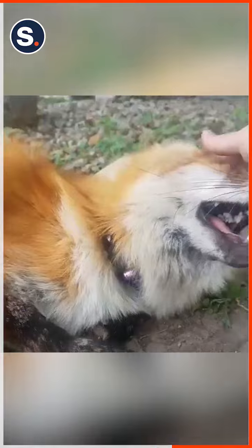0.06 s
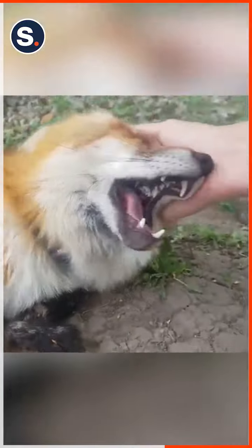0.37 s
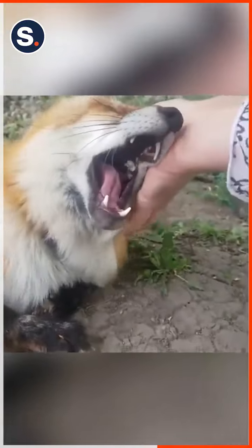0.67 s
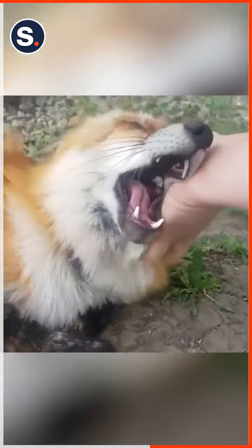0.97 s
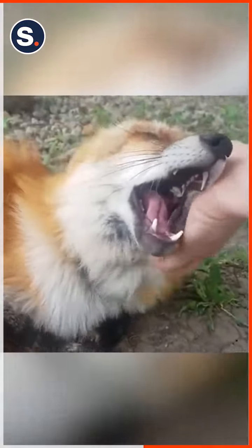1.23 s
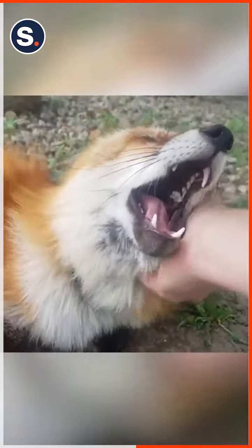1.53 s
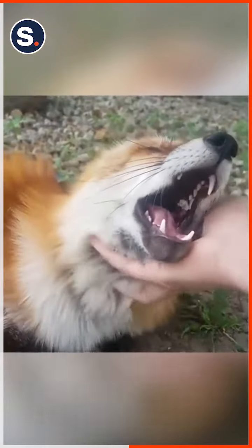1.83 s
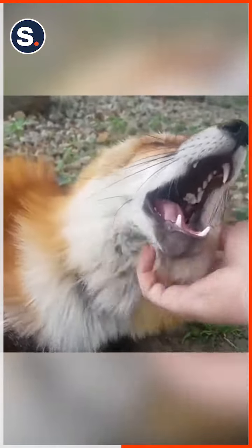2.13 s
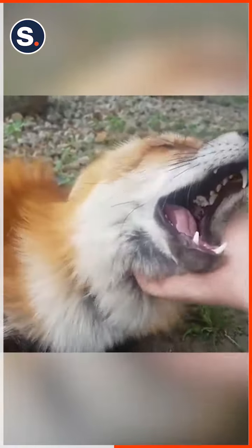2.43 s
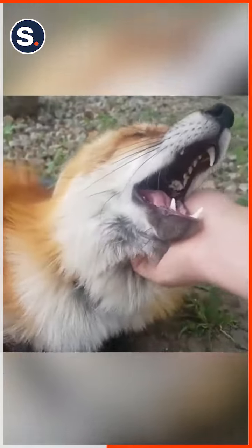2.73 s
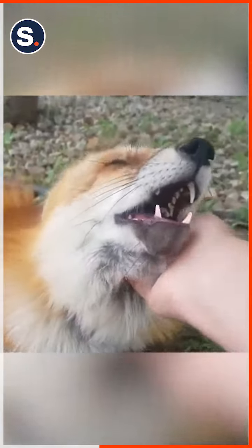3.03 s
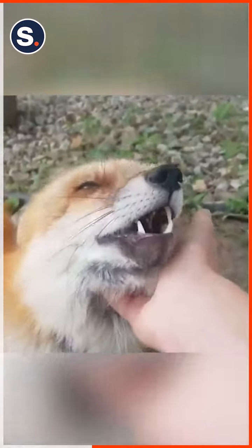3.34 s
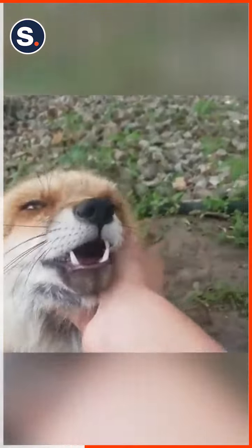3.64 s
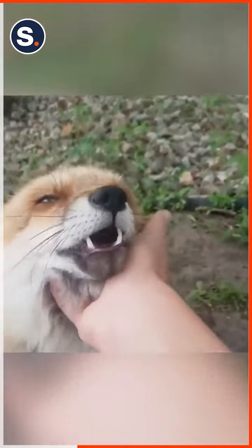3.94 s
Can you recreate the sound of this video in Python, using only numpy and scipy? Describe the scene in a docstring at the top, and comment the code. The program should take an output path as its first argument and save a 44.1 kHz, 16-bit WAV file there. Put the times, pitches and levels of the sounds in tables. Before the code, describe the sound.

A fox wails three times close by, in high, harsh squeals outdoors.

```python
"""A fox, petted under the chin, wails three times close by, outdoors. Its vocal folds oscillate
periodically, giving a high harmonic squeal that sags in pitch. At times the period doubles, adding
subharmonics and one short bark, or the folds slap irregularly and ring the throat as rasps and clicks.
The mouth filters the overtones and the air hissing through the jaws; the direction shifts as the head
turns. Behind it lie soft air noise, a distant hum and one swell of low rumble."""
import sys
import numpy as np
from scipy import signal
from scipy.fft import rfft, irfft
from scipy.io import wavfile
from scipy.ndimage import uniform_filter1d

SR = 44100
rng = np.random.default_rng(int(sys.argv[2]) if len(sys.argv) > 2 else 0)


def inscribe(sig):
    """Save sig as 16-bit PCM at rate SR to the path in sys.argv[1].

    A 1-D sig is mono; a 2-D sig holds one channel per row.
    Samples are clipped to [-1, 1] before scaling.
    """
    pcm = np.round(np.clip(np.atleast_2d(sig).T, -1, 1) * 32767)
    wavfile.write(sys.argv[1], SR, pcm.astype(np.int16))


N = 176400
T = np.arange(N) / SR

# Spectrum of the outdoor air: f/Hz, relative level/dB
AIR_SPECTRUM = [(35, -14.5), (80, -4), (190, -14), (450, -8.5), (750, -16.5), (1400, -15.5), (6000, -44.5),
                (13000, -38)]
# Partials of the distant hum: f/Hz, level/dB
HUM_PARTIALS = [(72, -57), (86, -55.5), (143.5, -60)]
# Throat resonances: f/Hz, bandwidth per stage/Hz, gain/dB
FORMANTS = [(1104, 400, -2.5), (2032, 377, 6.5), (2396, 350, -1.5)]
# Mouth response with the jaws wide: f/Hz, gain/dB
MOUTH_WIDE = [(2800, -5.5), (3600, 16), (4600, 10), (5500, 4.5), (6300, 10.5), (7100, 15), (7900, 3.5),
              (9500, -5.5), (10700, 5.5), (12600, -15)]
# Mouth response when narrowed: f/Hz, gain/dB
MOUTH_NARROW = [(3000, 13), (3400, -9), (4100, 4), (5000, 10), (6200, -23), (7600, -12), (8500, 7),
                (10500, -6), (13000, -4)]
# Narrowing of the mouth: t/s, fraction (0-1)
NARROWING = [(.93, 0), (1.02, 0.97), (1.35, 0.57), (2.45, 0.06), (2.8, 0.05), (3.0, 0.95)]
# Direction as the head turns: t/s, left-right difference of harmonic 1/dB, of harmonic 2/dB
HEAD_TURN = [(.4, -9.5, 8), (.85, -8, -0.5), (2.3, 2.5, -3), (2.7, 12, -5.5), (3.6, 5.5, 0)]
# Catches of the voice: t/s, peak level/dB
CLICKS = [(1.324, -19.5), (1.668, -11), (2.225, -21), (3.408, -33)]
# Irregular slapping of the folds: start/s, end/s, level/dB, relative gain of low resonances/dB
RASPS = [(1.446, 1.55, -26, 1), (1.673, 1.697, -24.5, 3.5), (1.846, 1.904, -23, -2), (1.91, 1.95, -33, 3.5),
         (2.399, 2.449, -38, -7), (2.829, 2.935, -31, 10), (3.674, 3.78, -31, 0)]
# Period doubling: start/s, end/s, level/dB, relative gain of low resonances/dB
DOUBLINGS = [(1.288, 1.32, -43, -20), (1.627, 1.653, -39, 8), (3.603, 3.69, -27, -9.5),
             (3.692, 3.824, -25, 0.5), (3.833, 4.047, -27, 3)]
# The three wails: start/s, end/s
WAILS = [(-.02, 1.952), (2.223, 2.958), (3.445, 4.05)]
# Roughness of the voice: t/s, fraction (0-1)
ROUGHNESS = [(.92,0),(.96,.85),(1.13,0.2),(1.22,0.34),(1.9,0.49),(2.43,0.5),(2.48,0.04),(2.8,0.2),(2.86,1),(3.48,0.65),(3.63,0.34),(3.87,0.25)]
# Pitch, and the second harmonic, which jumps at register breaks: t/s, fundamental f/Hz, level/dB
PITCH_AND_SECOND = [(.02,965.5,-20),(.07,899,-34.5),(.12,924,-20.5),(.26,898,-27.5),(.288,935.4,-17.5),(.32,917,-22),(.335,874,-43),(.39,911,-31.5),(.49,888,-36.5),(.515,917,-18),(.62,902,-19.5),(.665,925,-13.5),(.692,907,-15.5),(.706,867,-33),(.79,911.6,-23.5),(.84,876,-29.5),(.935,882,-23.5),(.962,977,-26.5),(1.005,915,-27),(1.03,840,-40),(1.126,717.6,-34),(1.27,754.6,-37),(1.42,798.6,-32.5),(1.5,843,-30.5),(1.72,803.2,-39),(1.78,761.5,-35.5),(1.84,823,-23),(1.89,824,-53),
                    (2.235,1167,-34),(2.258,1035,-23),(2.283,907,-30.5),(2.315,1030,-37.5),(2.334,1032,-12),(2.37,951,-23),(2.398,1036,-28.5),(2.44,978,-15),(2.48,916.6,-20),(2.715,891,-14.5),(2.748,861,-17.5),(2.756,858.7,-29),(2.825,785.7,-32),(2.85,775.6,-58),
                    (3.45,949.3,-21),(3.472,866,-24),(3.495,769,-41.5),(3.55,735,-42),(3.575,815,-23.5),(3.608,660,-51),(3.66,682.3,-43),(3.8,714.8,-58),(3.86,679,-57)]
# First harmonic: t/s, level/dB
FIRST_HARMONIC = [(0,-33),(.42,-27.5),(.55,-35.5),(.96,-30.5),(1.07,-46.5),(1.33,-51.5),(1.5,-37.5),(1.9,-42),(2.23,-33.5),(2.41,-28.5),(2.64,-47.5),(2.79,-32),(2.86,-53.5),(3.45,-41)]
# Third harmonic, which cracks in and out: t/s, level/dB
THIRD_HARMONIC = [(.02,-35),(.315,-27.5),(.335,-43.5),(.5,-31.5),(.69,-31.5),(.71,-38),(.99,-38.5),(1.025,-31.5),(1.23,-27),(1.245,-46),(1.31,-28.5),(1.335,-44),(1.4,-35.5),(1.69,-35.5),(1.715,-22),(1.765,-32.5),(1.787,-19.5),(1.81,-37.5),(2.3,-47),(2.5,-34.5),(2.72,-29),(2.82,-47.5),(3.52,-33.5),(3.63,-31),(3.9,-36.5)]
# Treble: t/s, lower band level/dB, upper band level/dB
TREBLE_LEVELS = [(0,-47.5,-43),(.34,-50,-41),(.44,-36.5,-42.5),(.52,-46,-40.5),(.71,-47.5,-37.5),(.79,-37,-38),(.89,-50.5,-36),(1.06,-30.5,-45.5),(1.27,-47,-46),(1.45,-42.5,-40),(1.88,-36.5,-39),(2.23,-57.5,-48),(2.34,-52,-40),(2.8,-42,-37.5),(2.94,-40,-43.5),(3.45,-50.5,-60),(3.595,-39.5,-64),(3.61,-37.5,-49),(3.95,-36,-50.5)]

ATTACK_S, RELEASE_S = 0.0018, 0.027
JITTER_HZ, SHIMMER_DB = 239.2, 1  # bandwidth of fast unrest; level spread at full roughness
TREBLE_PAN_DB, RASP_PAN_DB, DOUBLING_PAN_DB = -7.5, -0.5, -3.5  # left minus right


def amp(db):
    """Amplitude ratio of a level in decibels."""
    return 10 ** (np.asarray(db) / 20)


def unit(x):
    """Normalisation to rms 1."""
    return x / np.sqrt(np.mean(x ** 2) + 1e-20)


def curves(rows):
    """Linear interpolation of each column in time."""
    times, *columns = np.transpose(rows)
    return [np.interp(T, times, column) for column in columns]


def gate(start, end):
    """Envelope with linear attack, hold and quadratic release."""
    return np.clip((T - start) / ATTACK_S + .5, 0, 1) * np.clip(1 - (T - end) / RELEASE_S, 0, 1) ** 2


def gates(spans):
    """Sum of the envelopes of several spans."""
    return sum(gate(start, end) for start, end, *_ in spans)


def lowpass(order, hz):
    """Maximally flat low-pass sections."""
    return signal.butter(order, hz, fs=SR, output="sos")


def drift(hz):
    """Random modulation: low-passed noise of rms 1."""
    return unit(signal.sosfilt(lowpass(2, hz), rng.standard_normal(N + SR))[SR:])


def colour(x, spectrum):
    """Filtering as multiplication in the frequency domain."""
    hz, db = np.transpose(spectrum)
    bins_hz = np.arange(N // 2 + 1) * SR / N
    gain = amp(np.interp(np.log(bins_hz + 1e-3), np.log(hz), db))
    return irfft(rfft(x) * gain, N)


def resonate(x, hz, width_hz):
    """Two equal resonators in cascade give steep skirts."""
    b, a = signal.iirpeak(hz, hz / width_hz, fs=SR)
    return signal.lfilter(b, a, signal.lfilter(b, a, x + 1e-18))


def place(x, pan_db, right_lag_s=.0001):
    """Direction from level and time differences between the channels."""
    left_gain = amp(pan_db)
    return np.array([left_gain * x, np.interp(T - right_lag_s, T, x)]) * 2 / (1 + left_gain)


def spread(mid, side, width):
    """Decorrelation: an independent signal enters the channels in antiphase."""
    return mid + width * np.array([side, -side])


def outdoors():
    """Superposition of diffuse air noise, a phase-modulated hum and a swell of narrow-band rumble."""
    mid, side = [unit(colour(rng.standard_normal(N), AIR_SPECTRUM)) for _ in range(2)]
    air = amp(-51) * spread(mid, side, width=.65)
    hum = sum(amp(db) * np.sqrt(2) * np.cos(2 * np.pi * hz * T + 1.63 * drift(hz=2.35))
              for hz, db in HUM_PARTIALS)
    swell = amp(-41.5) * np.exp(-.5 * ((T - 1.183) / .25) ** 2)
    rumble = unit(resonate(rng.standard_normal(N), hz=77, width_hz=37))
    return air + hum + swell * rumble


def formants(source):
    """The throat as parallel resonators, one output for each."""
    return [amp(db) * resonate(source, hz, width) for hz, width, db in FORMANTS]


def throat(source, spans, chest_db):
    """Source-filter model: each span sets its level and the weight of first formant and chest."""
    first, *upper = formants(source)
    low = first + amp(chest_db) * resonate(source, hz=430, width_hz=500)
    high = sum(upper)
    voiced = sum(gate(start, end) * amp(db) * (high + amp(low_db) * low)
                 for start, end, db, low_db in spans)
    return voiced / np.std(low + high)


def mouth(source, split_hz=5630, window_s=.0136):
    """The mouth opening filters the source; returns two treble bands, each held at running rms 1."""
    narrow = curves(NARROWING)[0]
    shaped = (1 - narrow) * colour(source, MOUTH_WIDE) + narrow * colour(source, MOUTH_NARROW)
    lower = signal.sosfiltfilt(lowpass(10, split_hz), shaped)
    return [band / np.sqrt(np.abs(uniform_filter1d(band ** 2, int(window_s * SR))) + 1e-20)
            for band in (lower, shaped - lower)]


def clicks():
    """Impulse response: each single hard slap of the folds rings the throat once."""
    impulses = np.zeros(N)
    for time, db in CLICKS:
        impulses[int(time * SR)] = amp(db)
    ringing = sum(formants(impulses))
    return place(ringing * impulses.max() / np.abs(ringing).max(), RASP_PAN_DB)


def rasp(phase, voice_level, rough, slap_spread_db=3):
    """Aperiodic excitation: uneven slaps on every other cycle and faint turbulence drive the throat."""
    slap_count = np.floor(np.maximum.accumulate(phase / (4 * np.pi) + .11 * drift(hz=297.6)))
    slaps = np.diff(slap_count, prepend=0) * amp(slap_spread_db * rng.standard_normal(N))
    ringing = throat(slaps, RASPS, chest_db=-16.5)
    breath = amp(-14.5) * voice_level * rough * unit(sum(formants(rng.standard_normal(N))))
    return place(signal.sosfilt(lowpass(10, hz=2580), ringing + breath), RASP_PAN_DB)


def period_doubling(phase):
    """Alternating strong and weak cycles add half-integer harmonics; one dominates in the bark."""
    halves = sum(np.cos((k + .5) * phase) for k in range(8))
    flutter = 1 + .28 * np.cos(phase / 6)
    bark = gate(start=1.853, end=1.897) * amp(-15.5) * flutter * np.sqrt(2) * np.cos(1.5 * phase)
    return place(throat(halves, DOUBLINGS, chest_db=-19.5) + bark, DOUBLING_PAN_DB)


def overtones(phase, rough, flicker_db=6, scatter_rad=1.3):
    """Flickering harmonics 4-18: phase noise broadens them, period doubling adds buzzing sidebands."""
    tones = 0
    for k in range(4, 19):
        flicker = amp(flicker_db * drift(hz=14.1))
        offset = rng.uniform(0, 2 * np.pi) + scatter_rad * rough * drift(JITTER_HZ)
        tones += flicker * np.cos(k * phase + offset)
    buzz = 1 + .73 * np.minimum(gates(DOUBLINGS), 1) * np.cos(phase / 2)
    return tones * buzz


def treble(phase, levels, rough):
    """Overtones and a puff of turbulence on each cycle pass the mouth; roughness shifts power to hiss."""
    tone_bands = mouth(overtones(phase, rough))
    puffs = 1 + .5 * np.cos(phase)
    hiss_bands, side_bands = [mouth(rng.standard_normal(N) * puffs) for _ in range(2)]
    hiss_shares = (.001 + .15 * rough, .03 + .5 * rough)  # lower band, upper band
    out = 0
    for level, tones, hiss, side, share in zip(levels, tone_bands, hiss_bands, side_bands, hiss_shares):
        direct = place(np.sqrt(1 - share) * tones + np.sqrt(share) * hiss, TREBLE_PAN_DB)
        out += level * spread(direct, np.sqrt(share) * side, width=.79)
    return out


def fold_phase(pitch, rough):
    """Phase of the folds as the integral of frequency, perturbed by fast jitter and slower waver."""
    jitter = (.026 * rough + .01 * gates(RASPS)) * drift(JITTER_HZ)
    waver = (.002076 + .012 * rough) * drift(hz=56.6)
    return 2 * np.pi * np.cumsum(pitch * (1 + jitter + waver)) / SR


def squeal(phase, levels, rough):
    """Periodic oscillation of the folds gives three strong harmonics, which shimmer with roughness."""
    pans = curves(HEAD_TURN) + [TREBLE_PAN_DB]
    out = 0
    for k, (level, pan_db) in enumerate(zip(levels, pans), 1):
        shimmer = amp(SHIMMER_DB * rough * drift(JITTER_HZ))
        out += place(level * shimmer * np.sqrt(2) * np.cos(k * phase), pan_db)
    return out


def scene():
    """Superposition of the voice, whose layers share one oscillation, its clicks and the background."""
    pitch, second_db = curves(PITCH_AND_SECOND)
    levels_db = curves(FIRST_HARMONIC) + [second_db] + curves(THIRD_HARMONIC) + curves(TREBLE_LEVELS)
    levels = amp(levels_db) * gates(WAILS)
    rough = curves(ROUGHNESS)[0]
    phase = fold_phase(pitch, rough)
    wails = squeal(phase, levels[:3], rough) + treble(phase, levels[3:], rough)
    breaks = period_doubling(phase) + rasp(phase, levels.sum(axis=0), rough) + clicks()
    return wails + breaks + outdoors()


def record(dry, cutoff_hz=13300):
    """Band limiting by a steep elliptic low-pass."""
    return signal.sosfilt(signal.ellip(12, .1, 90, cutoff_hz, fs=SR, output="sos"), dry)


dry = scene()
out = record(dry)
inscribe(out)
```